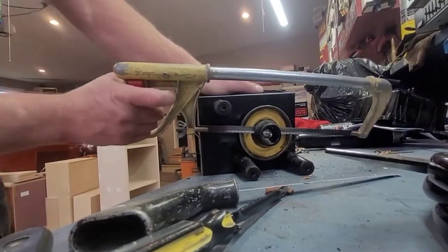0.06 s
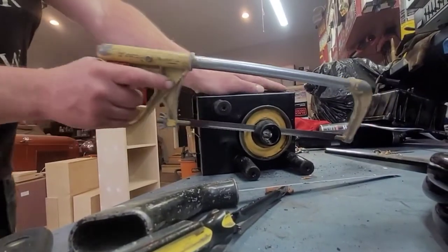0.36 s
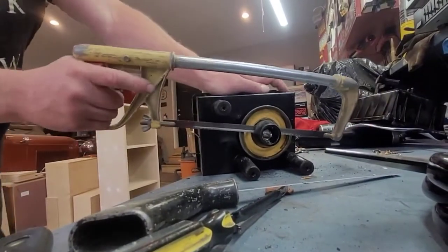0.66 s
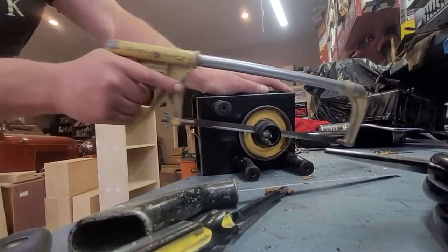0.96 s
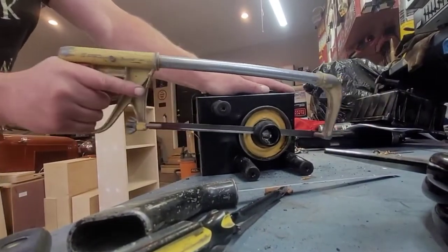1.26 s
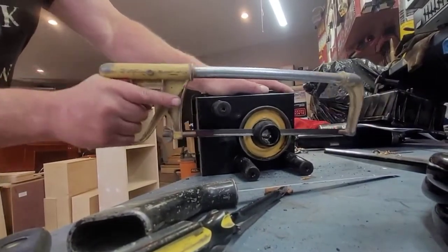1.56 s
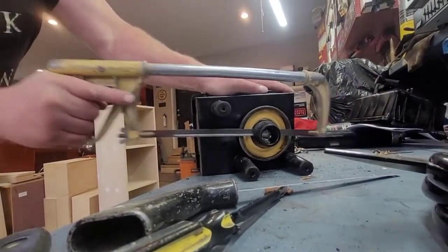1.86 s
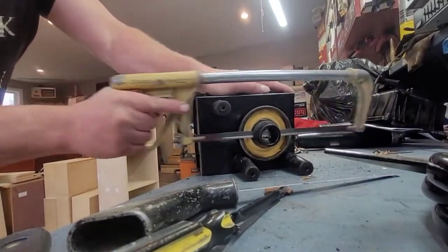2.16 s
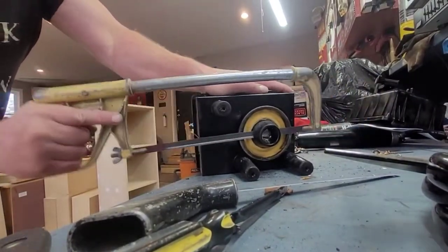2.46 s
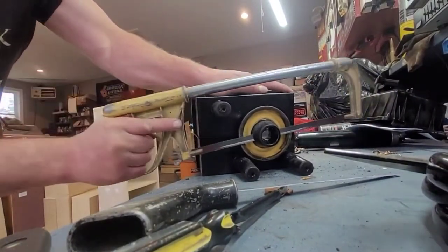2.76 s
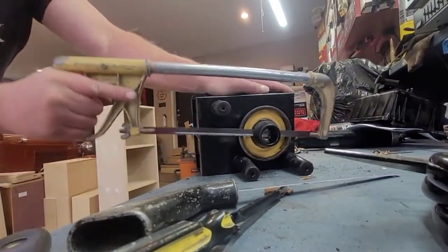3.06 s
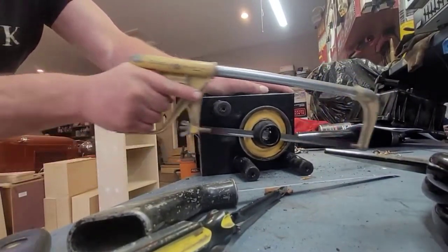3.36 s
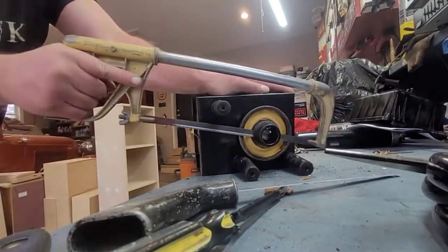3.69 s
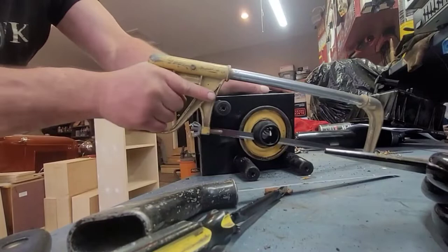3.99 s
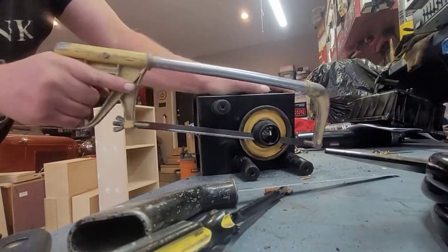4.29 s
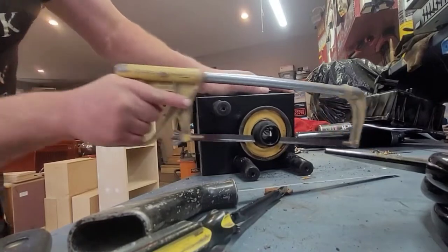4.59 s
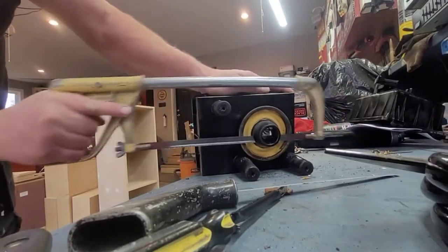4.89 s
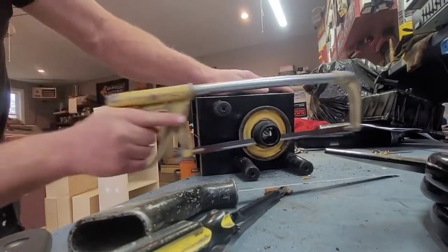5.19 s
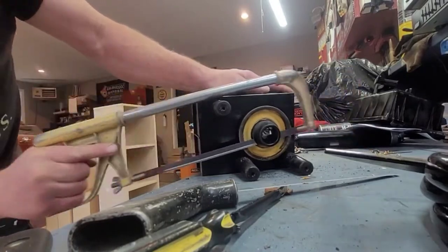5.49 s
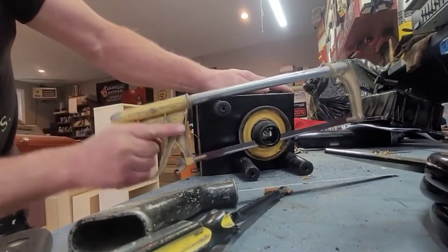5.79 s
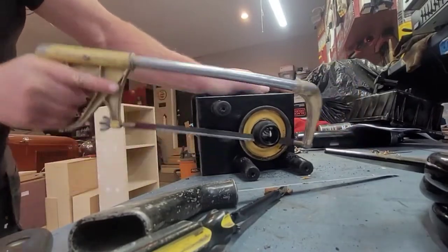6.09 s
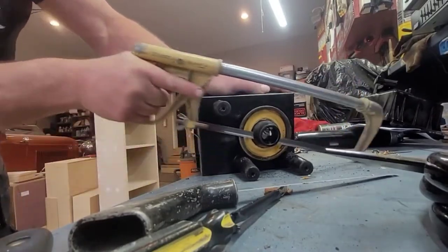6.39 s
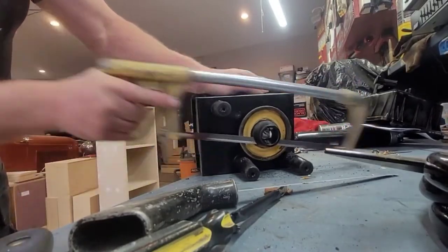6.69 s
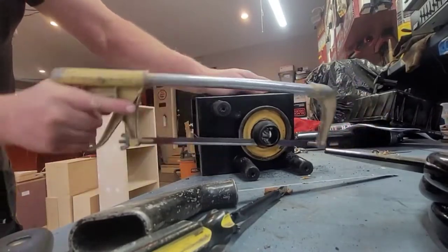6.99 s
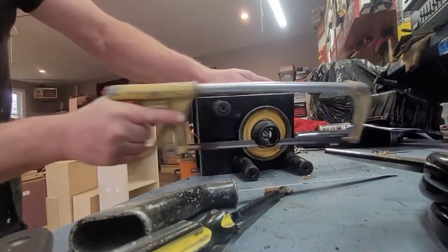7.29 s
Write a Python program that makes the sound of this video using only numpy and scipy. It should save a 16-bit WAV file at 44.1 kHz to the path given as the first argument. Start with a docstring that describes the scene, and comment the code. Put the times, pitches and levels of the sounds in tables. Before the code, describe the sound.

A hand hacksaw cuts a hollow plastic housing on a garage workbench, heard close by. For the first second there are only a few light scuffs as the blade settles. At about 1 second the sawing begins and continues to the end at around 7.4 seconds, with a push roughly every 0.6 seconds, slightly quicker late on. Each push bites with a loud, hollow rasp and a buzz that glides with the blade's speed; each pull drags more lightly. The steel blade adds a thin hiss, and the bench shakes with a low rumble. Teeth sometimes catch, giving short knocks and dull thuds, most clearly around 1.1, 2.1, 3.4, 4 and 6.4 seconds, with a quick cluster near 6.9 seconds. The last strokes are a little softer. Faint steady room noise and a short reverberation lie behind.

```python
"""A hand hacksaw rasps through a hollow plastic housing held on a garage workbench, close by.
After a few light scuffs, pushes bite hard and pulls drag lightly. Teeth strike the cut at a rate set by
the arm's speed and chips tear off, so the housing and the bench ring while the steel blade hisses.
Now and then a tooth catches with a knock. Faint room noise and a short reverberation lie behind."""
import sys
import numpy as np
from scipy import signal
from scipy.fft import rfft, irfft
from scipy.io import wavfile
from scipy.ndimage import uniform_filter1d

SR = 44100
rng = np.random.default_rng(int(sys.argv[2]) if len(sys.argv) > 2 else 0)


def master(y):
    """Save y as 16-bit WAV."""
    cut = np.clip(np.atleast_2d(y).T, -1, 1)
    pcm = np.round(cut * 32767)  # scale
    wavfile.write(sys.argv[1], SR, pcm.astype(np.int16))


N = 328545

# resonances: pitch_hz, width_hz, left_db, right_db
BENCH_MODES = [(52.3, 24, -14, -15.5), (107.6, 28.5, -13, -10), (150, 37, -13, -11)]
HOUSING_MODES = [(213, 23.5, -22.5, -2), (269, 23.7, -6.5, -1.5), (352.3, 21.4, -10, -0.5),
                 (445, 37, -13.5, -8), (582, 136, -8.5, -9.5), (699, 51, -6, 0.5), (732, 59, -8.5, -3),
                 (878, 64, -4, -6), (1013, 174, -9, -11.5), (1160.4, 138, -33, -6.5), (1300, 29, -13, -6.5),
                 (1510, 168, -20, -16.5)]
BLADE_MODES = [(1728, 121, -16, -17), (1926, 93, -18.5, -26), (2364, 220, -19.5, -21),
               (2642, 223, -22, -22), (3197, 350, -27, -25.5), (3700, 344, -24, -27.5),
               (4100, 147, -22.5, -24), (4344, 420, -23, -27), (5475, 1110, -25, -27),
               (6150, 430, -29, -29.5), (7235, 365, -25.5, -22.5), (7795, 570, -23.5, -24.5),
               (10520, 1450, -30, -30), (11900, 1700, -27.5, -26), (14900, 3100, -27.5, -29.5)]
# saw strokes, levels relative: start_s, dig_s, target_s, stop_s, target_teeth_per_s, rasp_db, hiss_db,
# shake_db, pressure_rise_db, tooth_tone_db, housing_upper_db, blade_lower_db
# the speed climbs toward its target, due at target_s, unless the stroke stops first
PUSHES = [(1.039, 1.062, 1.136, 1.194, 238, -19.5, -30, -30.5, 13, -9.5, 4, -0.5),
          (1.51, 1.554, 1.63, 1.66, 420, -16, -26.5, -40, 13, -9.5, 6, 0),
          (2.018, 2.075, 2.11, 2.226, 400, -15, -24, -36, 7.5, -10.5, 7.5, -1),
          (2.636, 2.69, 2.764, 2.918, 356, -19, -28, -38.5, -1, -8.5, 7.5, 0),
          (3.359, 3.39, 3.46, 3.617, 407, -16.5, -26.5, -33.5, -13.5, -10.5, 0, -2),
          (3.94, 3.968, 4.029, 4.171, 573, -14.5, -25, -32.5, -17, -3.5, 4, -0.5),
          (4.568, 4.632, 4.74, 4.858, 430, -22, -31.5, -42.5, 3, -5, -2.5, -3.5),
          (5.226, 5.237, 5.328, 5.445, 472, -18.5, -28, -40.5, -9, -4.5, 0.5, -3),
          (5.738, 5.78, 5.836, 5.954, 517, -17, -27, -36.5, -5.5, -2, 1, -2),
          (6.299, 6.335, 6.41, 6.5, 440, -19.5, -27.5, -32.5, -2.5, -9, 5.5, -1.5),
          (6.797, 6.831, 6.86, 6.99, 370, -20.5, -25.5, -35.5, -16, -24, 8, -2.5),
          (7.223, 7.26, 7.29, 7.405, 356, -24, -27.5, -41, -5, -23, 7.5, -3.5)]
PULLS = [(0.367, 0.38, 0.5, 0.68, 155, -37.5, -38.5, -47, 3, -11.5, 7, -3.5),
         (1.263, 1.286, 1.39, 1.477, 260, -28, -36, -39.5, -3.5, -13, 5.5, -3.5),
         (1.766, 1.808, 1.86, 1.955, 435, -25, -34, -39.5, 3.5, -14, 2, -2),
         (2.328, 2.352, 2.44, 2.553, 395, -26.5, -35, -42.5, -0.5, -12.5, 1.5, -4),
         (3.016, 3.066, 3.112, 3.243, 335, -31, -36.5, -40, -4.5, -20, .5, -5.5),
         (3.668, 3.69, 3.811, 3.9, 390, -26, -34, -38.5, -6.5, -9, -5, -4.5),
         (4.211, 4.226, 4.4, 4.506, 425, -26.5, -36.5, -38.5, -6.5, -6.5, -3.5, -3.5),
         (4.908, 4.943, 5.057, 5.115, 490, -29, -37.5, -41.5, 9, -6, -1.5, -2.5),
         (5.499, 5.535, 5.635, 5.713, 410, -23, -34, -39, 2, -5, 0, -2),
         (5.979, 6.03, 6.3, 6.256, 380, -28.5, -37.5, -38, -3.5, -12, 1, -1),
         (6.57, 6.608, 6.682, 6.77, 355, -25.5, -35, -39.5, -2.5, -13, 3, -4),
         (7.019, 7.045, 7.6, 7.196, 380, -25.5, -34, -43, -2, -24, 11.5, 0)]


def from_db(db):
    """Decibels to gain."""
    return 10 ** (np.asarray(db) / 20)


def unit_rms(x):
    """Scale to unit rms."""
    return x / np.sqrt(np.mean(x ** 2) + 1e-20)


def at_hz(points, hz):
    """Interpolate a table along log frequency."""
    points_hz, values = np.array(points).T
    return np.interp(np.log(np.maximum(hz, 1)), np.log(points_hz), values)


def butter(x, hz, kind, order=2):
    """Butterworth filter."""
    sos = signal.butter(order, np.clip(hz, 10, .45 * SR), kind, fs=SR, output="sos")
    return signal.sosfilt(sos, x + 1e-18)


def drift(rate_hz):
    """Smooth random wander, unit rms."""
    return unit_rms(butter(rng.standard_normal(N), rate_hz, "low"))


def mix(a, b, b_over_a_db):
    """Constant-power blend."""
    ratio = from_db(b_over_a_db)
    return (unit_rms(a) + ratio * unit_rms(b)) / np.sqrt(1 + ratio ** 2)


def ring(force, modes):
    """Parallel resonators of alternating sign, each with its own left and right gain."""
    out = np.zeros((2, N))
    for k, (hz, width_hz, left_db, right_db) in enumerate(modes):
        r = np.exp(-np.pi * width_hz / SR)
        feedback = [1, -2 * r * np.cos(2 * np.pi * hz / SR), r * r]
        motion = signal.lfilter(np.array([1, 0, -1]) * (1 - r * r) / 2, feedback, force + 1e-18)
        out += (-1) ** k * from_db([[left_db], [right_db]]) * motion
    return out


def room_air(level_db=-63.5):
    """Faint steady room noise, partly common to both channels."""
    # noise spectrum: freq_hz, relative_db
    spectrum = [(18, -32), (30, -1), (307, -14), (432, -5), (518, 3.5), (1770, -24), (3400, -16.5),
                (15500, -25)]
    colour = from_db(at_hz(spectrum, np.arange(N // 2 + 1) * SR / N))
    white = rng.standard_normal(N) + 1.2 * rng.standard_normal((2, N))
    return from_db(level_db) * unit_rms(irfft(rfft(white) * colour, N))


def garage_reverb(x, gap_s=0.0054):
    """Diffuse reflections, separate per channel, dying soonest in the top treble."""
    # room decay: freq_hz, t60_s
    decay = [(100, 0.49), (1000, 0.44), (5000, 0.57), (15000, 0.24)]
    t = np.arange(SR // 2) / SR
    edges_hz = np.geomspace(40, 18000, 9)
    tail = 0
    for low, high in zip(edges_hz, edges_hz[1:]):
        t60_s = at_hz(decay, np.sqrt(low * high))
        band = butter(rng.standard_normal((2, len(t))), [low, high], "band")
        tail = tail + band * np.exp(-np.log(1000) * t / t60_s)
    tail = tail * (t > gap_s)
    return signal.fftconvolve(x, tail / np.linalg.norm(tail, axis=1, keepdims=True), axes=1)[:, :N]


def tooth_catches(snap_s=.002):
    """A snagged tooth lets go: the housing knocks and thuds on the bench, the blade snaps."""
    # catches, levels relative: time_s, knock_db, thud_db
    catches = [(0.159, -32, -50), (1.08, -8.5, 1), (1.142, -3, -1), (1.555, -14, -25), (2.077, -2, -18),
               (2.703, -11, -14), (3.163, -22, -5), (3.198, -20.5, -10), (3.393, -14, 1), (3.402, -7, 8),
               (3.411, -21, -5), (3.474, -9, -14), (3.968, -4.5, 1), (4.134, -6, -0.5), (4.321, -8.5, -26),
               (4.404, -9, -26), (4.661, -10, -15), (5.238, -14.5, -11), (5.454, -21, -28),
               (6.354, -4, -25), (6.468, -7.5, 3.5), (6.678, -7, -12), (6.831, -8.5, -24),
               (6.853, -3.5, -14), (6.875, -3, -26), (6.967, -28, -4.5)]
    blows, jolts = np.zeros((2, N))
    for time_s, knock_db, thud_db in catches:
        i = round(time_s * SR)
        blows[i], jolts[i] = from_db([knock_db, thud_db])
    t = np.arange(SR // 50) / SR
    burst = rng.standard_normal(len(t)) * np.exp(-t / snap_s)
    bursts = signal.fftconvolve(blows, burst / np.linalg.norm(burst))[:N]
    knock = from_db(33) * ring(butter(blows, [170, 1700], "band"), HOUSING_MODES)
    thud = from_db(35.5) * ring(butter(jolts, [75, 220], "band"), [*BENCH_MODES, *HOUSING_MODES[:3]])
    snap = from_db(16.5) * ring(butter(bursts, 1300, "high"), BLADE_MODES)
    return knock + thud + snap


def arm_motion(lead_s=.005, coast_s=.02, creep_teeth_per_s=30, tone_rise_db=10):
    """Most strokes speed up and slow; two late pulls keep speeding up until they stop abruptly."""
    t = np.arange(N) / SR
    teeth_per_s, colour_db = np.zeros(N), np.zeros((3, N))
    strokes = sorted(map(tuple, [*PUSHES, *PULLS]))
    for start_s, _, target_s, stop_s, target_teeth_per_s, *_, tone_db, upper_db, lower_db in strokes:
        along = np.interp(t, [start_s - lead_s, target_s, stop_s + coast_s], [0, .5, 1])
        moving = (along > 0) & (along < 1)
        teeth_per_s[moving] += target_teeth_per_s * np.sin(np.pi * along[moving]) ** .9
        colour_db[:, int(start_s * SR):] = [[tone_db], [upper_db], [lower_db]]  # set by the bite angle
        colour_db[0, moving] += tone_rise_db * (along[moving] - .5)  # teeth mesh more evenly late on
    return np.maximum(teeth_per_s, creep_teeth_per_s), *uniform_filter1d(colour_db, size=900, axis=1)


def bite(start_s, dig_s, stop_s, levels_db, rise_db, arch, skate_db=(-3.5, -1.5, -4)):
    """Teeth skate, then dig in: rasp, hiss and shake power follow an arch tilted by hand pressure."""
    span = np.arange(int(start_s * SR), min(int(stop_s * SR), N))
    along = np.linspace(0, 1, len(span))
    db = np.array(levels_db)[:, None] + rise_db * (along - .5) + np.outer(skate_db, span < dig_s * SR)
    shape = np.abs(np.sin(np.pi * along)) ** np.array(arch)[:, None]
    return span, (from_db(db) * shape) ** 2


def after_ring(power, after_db, t60_s):
    """Envelope of a part that stores some energy and loses it exponentially."""
    r = from_db(-60 / (t60_s * SR)) ** 2
    stored = signal.lfilter([1 - r], [1, -r], power + 1e-18)
    return np.sqrt(power + from_db(after_db) ** 2 * stored)


def stroke_envelopes(push_arch=(1.41, 1.21, 0.53), pull_arch=(0.82, 0.42, 0.6)):
    """Rasp, hiss and shake envelopes, one arch exponent each: pushes dig in, pulls scrape evenly."""
    # blade settling into the cut: start_s, stop_s, rasp_db, hiss_db, shake_db, pressure_rise_db
    scuffs = [(.075, .198, -53, -60, -66, 15), (0.203, 0.433, -52, -72, -68, 14),
              (0.563, 0.819, -45.5, -49.5, -57.5, -12), (0.738, .959, -54, -58.5, -75, 5.5),
              (0.929, 0.987, -44.5, -53.5, -59, 0)]
    passes = []
    for strokes, arch in ((PUSHES, push_arch), (PULLS, pull_arch)):
        for start_s, dig_s, _, stop_s, _, rasp_db, hiss_db, shake_db, rise_db, *_ in strokes:
            passes.append(bite(start_s, dig_s, stop_s, (rasp_db, hiss_db, shake_db), rise_db, arch))
    for start_s, stop_s, *levels_db, rise_db in scuffs:
        passes.append(bite(start_s, start_s, stop_s, levels_db, rise_db, pull_arch))
    power = np.zeros((3, N))
    for span, pass_power in passes:
        power[:, span] += pass_power
    return (after_ring(power[0], after_db=-11, t60_s=0.4),
            after_ring(power[1], after_db=-15, t60_s=0.42),
            after_ring(power[2], after_db=2.8, t60_s=0.27))


def tooth_kicks(teeth_per_s, jitter=.018, uneven_db=4.0):
    """One kick of random size per tooth, and the tooth phase (0-1)."""
    teeth_passed = np.cumsum(teeth_per_s * (1 + jitter * drift(70))) / SR
    kicks = np.diff(np.floor(teeth_passed), prepend=0) * from_db(uneven_db * rng.standard_normal(N))
    return unit_rms(kicks / np.sqrt(teeth_per_s)), teeth_passed % 1


def stick_slip(judder_db=0.5, snags_per_s=45, snag_size=0.82, snag_s=0.0031):
    """The blade grips and slips unevenly; small snags release suddenly and die in milliseconds."""
    jerks = (rng.random(N) < snags_per_s / SR) * snag_size * rng.uniform(0.66, 1.13, N)
    snags = signal.lfilter([1], [1, -np.exp(-1 / (snag_s * SR))], jerks + 1e-18)
    return unit_rms(from_db(judder_db * drift(60)) + snags)


def chips(per_s, spread_db):
    """Tiny fractures of the plastic, random in time and size."""
    sizes = from_db(spread_db * np.minimum(rng.exponential(1, N), 4)) * rng.choice([-1, 1], N)
    return unit_rms(sizes * (rng.random(N) < per_s / SR))


def blade_scrape(tooth_phase, judder, pulse_depth=0.12, noise_gain=2.76, lag_ms=0.074):
    """Fine scraping, strongest as each tooth enters; the long blade sounds partly unlike on each side."""
    grit = chips(14000, spread_db=-1.5)
    late_grit = np.interp(np.arange(N) - lag_ms * SR / 1000, np.arange(N), grit)
    scrape = np.array([grit, late_grit]) + noise_gain * rng.standard_normal((2, N))
    pulsing = 1 + pulse_depth * np.cos(2 * np.pi * tooth_phase)
    return butter(scrape * pulsing * judder, 1950, "high")


def blade_slide(x, ring_s=0.0051, share=0.35, block=4096):
    """The sliding blade's free lengths change: new random fine resonances every half block."""
    t = np.arange(block // 2) / SR
    window = np.sin(np.pi * np.arange(block) / block)
    padded = np.pad(x, ((0, 0), (0, block)))
    rung = np.zeros((2, N + 2 * block))
    for i in range(0, N, block // 2):
        response = rng.standard_normal(len(t)) * np.exp(-t / ring_s)
        response /= np.linalg.norm(response)
        piece = signal.fftconvolve(padded[:, i:i + block] * window, response[None], axes=1)
        rung[:, i:i + piece.shape[1]] += piece
    return np.sqrt(1 - share) * x + np.sqrt(share) * rung[:, :N]


def blade_ring(scrape, lower_db):
    """The steel rings, alternate modes fed by swapped channels; a deeper bite lifts the lower modes."""
    scrape = blade_slide(scrape)
    lower, upper = (unit_rms(ring(scrape, modes[::2]) + ring(scrape[::-1], modes[1::2]))
                    for modes in (BLADE_MODES[:6], BLADE_MODES[6:]))
    return upper + from_db(lower_db) * lower


def tooth_tone(tooth_phase, harmonics=(1, 0.72, 0.16), waver_db=4.0):
    """Evenly spaced teeth rock the housing with a gliding tone."""
    tone = unit_rms(sum(size * from_db(waver_db * drift(53.4)) * np.sin(2 * np.pi * k * tooth_phase)
                        for k, size in enumerate(harmonics, 1)))
    tone = tone + 0.9 * unit_rms(ring(tone, HOUSING_MODES))
    steady = tone / np.sqrt(uniform_filter1d(np.mean(tone ** 2, axis=0), size=900) + 1e-9)
    # the tooth tone carries neither deep bass nor treble
    return unit_rms(butter(butter(steady, 134, "high", order=4), 1140, "low", order=3))


def housing_rasp(force, upper_db):
    """The hollow housing rings, its upper modes upper_db above its lower ones."""
    force = butter(force, [170, 1700], "band")
    return mix(ring(force, HOUSING_MODES[:4]), ring(force, HOUSING_MODES[4:]), upper_db)


def sawing(rasp_db=-0.7, shake_db=1.0, hiss_db=-2.5, rub_db=-5.5, bright_db_per_octave=3.5):
    """Teeth and chips drive the housing, the bench under it and the blade."""
    rasp, hiss, shake = stroke_envelopes()
    teeth_per_s, tone_db, upper_db, lower_db = arm_motion()
    kicks, tooth_phase = tooth_kicks(teeth_per_s)
    judder = stick_slip()
    rub = from_db(rub_db) * rng.standard_normal((2, N))  # blade flanks on the sides of the cut
    force = judder * (0.3 * kicks + chips(2500, spread_db=3.0) + rub)
    speed_octaves = np.log2(np.maximum(teeth_per_s, 120) / 330)  # a faster blade sounds brighter
    body = housing_rasp(force, upper_db + 1.5 + bright_db_per_octave * speed_octaves)
    housing = from_db(rasp_db) * rasp * mix(body, tooth_tone(tooth_phase), tone_db + 2.0)
    bench = from_db(shake_db) * shake * unit_rms(ring(butter(force, [55, 190], "band"), BENCH_MODES))
    blade = from_db(hiss_db) * hiss * blade_ring(blade_scrape(tooth_phase, judder), lower_db)
    return housing + bench + blade


def scene(reverb_db=-20.5):
    """The saw close by, the garage around it."""
    saw = sawing() + tooth_catches()
    return saw + from_db(reverb_db) * garage_reverb(saw) + room_air()


def record(dry, cutoff_hz=15950):
    """Steep low-pass."""
    return signal.sosfilt(signal.ellip(12, .1, 80, cutoff_hz, fs=SR, output="sos"), dry)


dry = scene()
out = record(dry)
master(out)
```